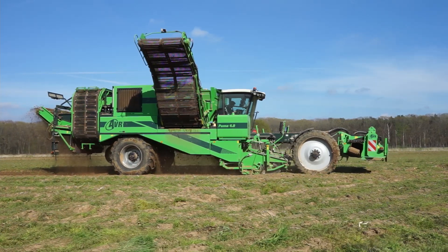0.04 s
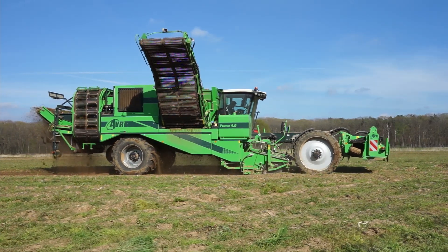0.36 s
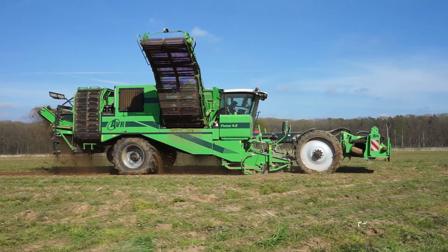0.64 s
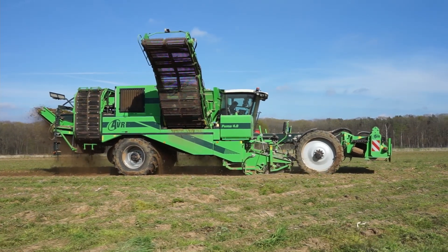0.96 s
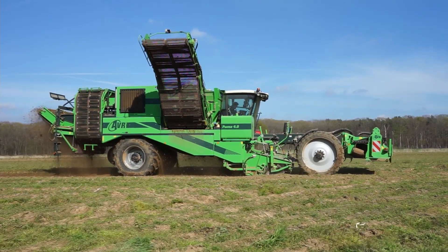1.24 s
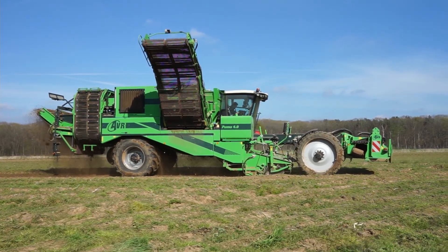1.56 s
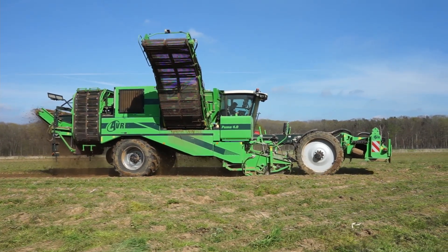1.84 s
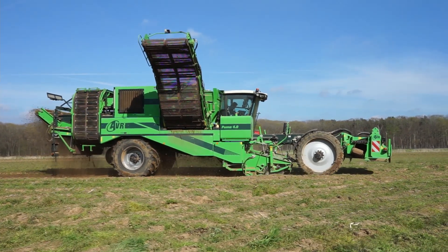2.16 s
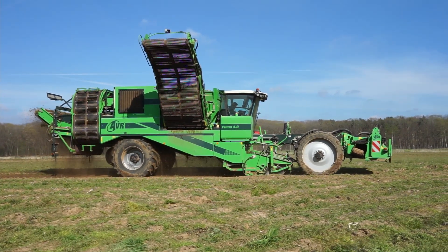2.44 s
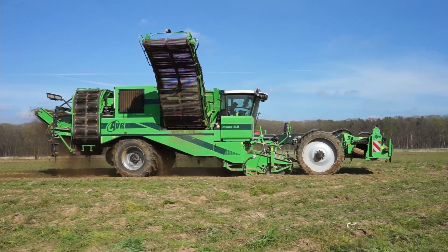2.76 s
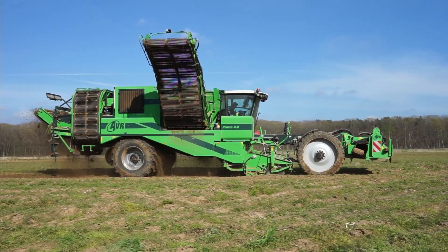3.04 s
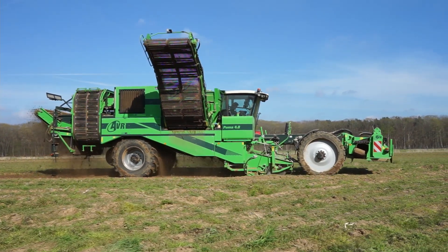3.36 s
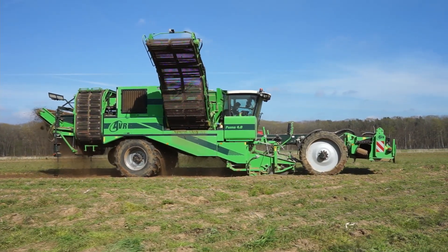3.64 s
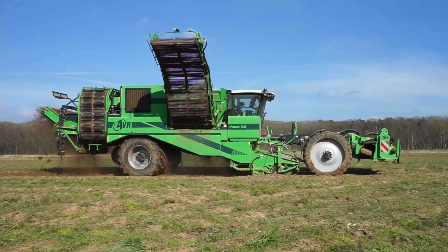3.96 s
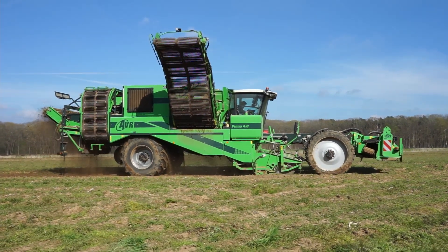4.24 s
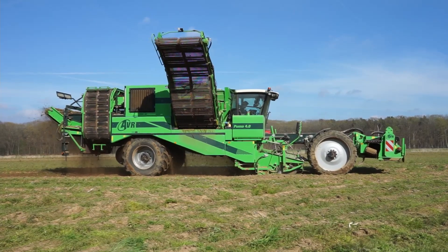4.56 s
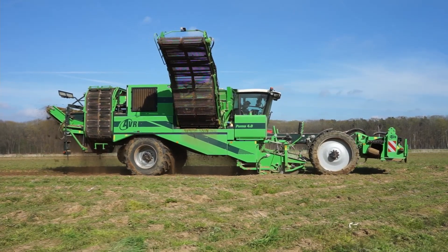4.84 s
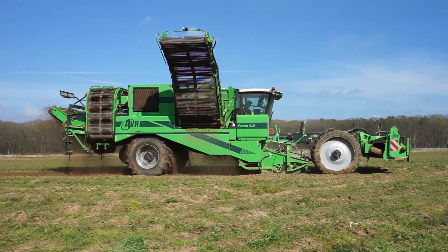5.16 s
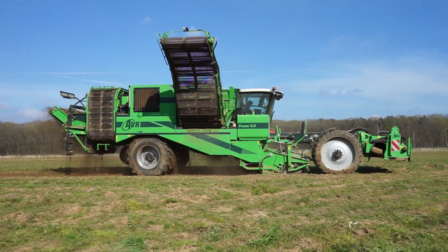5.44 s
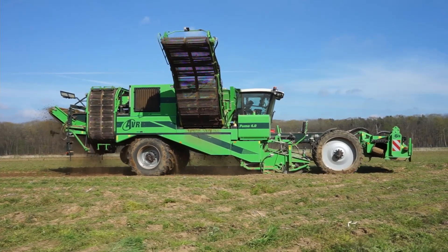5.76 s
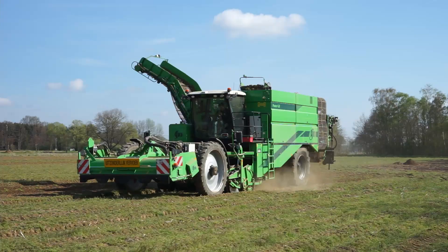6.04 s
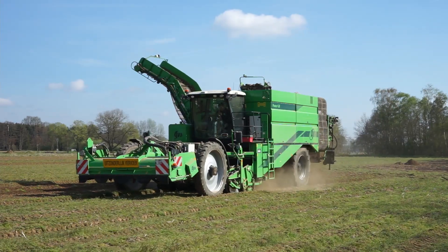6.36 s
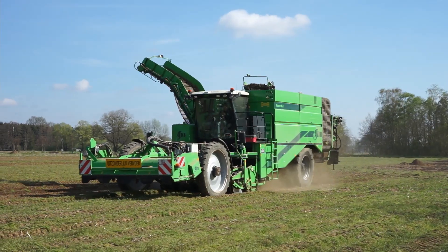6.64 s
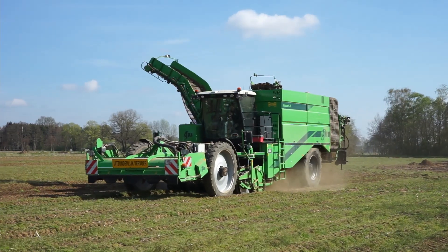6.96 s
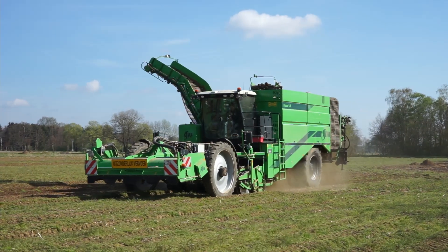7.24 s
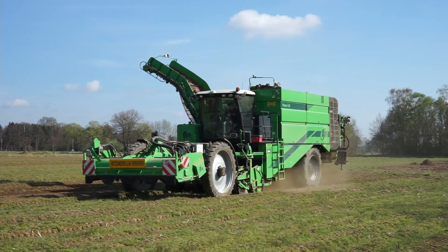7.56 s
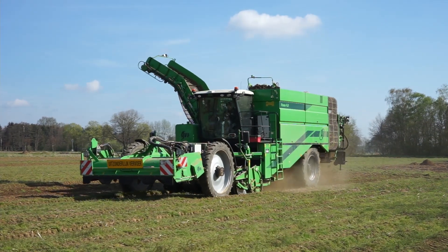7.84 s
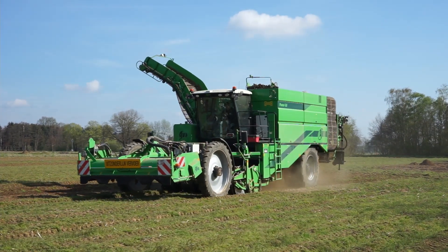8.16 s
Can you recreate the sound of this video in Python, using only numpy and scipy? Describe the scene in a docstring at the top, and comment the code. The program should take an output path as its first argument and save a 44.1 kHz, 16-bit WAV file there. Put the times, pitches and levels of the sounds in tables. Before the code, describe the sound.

A large farm harvester's diesel drones, with whining hydraulics and rattling belts, in gusty wind; later, heavy clods boom on its sheet steel.

```python
"""A self-propelled potato harvester creeps over a windy field. First we hear it from the side: its
six-cylinder diesel drones, a hydraulic pump whines, sieve belts rattle and crop drums on the steel
body, while gusts buffet the microphone. Near 4 seconds its open middle passes, and an echo sweeps
through the rattle. Just after 6 seconds we are suddenly in front of the machine. It grows louder as
it comes closer, and heavy clods boom on its sheet steel."""
import sys
import numpy as np
from scipy import signal
from scipy.fft import rfft, irfft, next_fast_len
from scipy.io import wavfile
from scipy.ndimage import uniform_filter1d, map_coordinates

SR = 44100
rng = np.random.default_rng(int(sys.argv[2]) if len(sys.argv) > 2 else 0)


def put_to_file(sound):
    """Save the sound as 16-bit audio at rate SR, in the file named by the first command-line argument."""
    columns = np.atleast_2d(sound).T  # one column per channel
    safe = np.clip(columns, -1, 1)
    whole_steps = np.round(safe * 32767)
    wavfile.write(sys.argv[1], SR, whole_steps.astype(np.int16))


N = 365588
TIME = np.arange(N) / SR
BESIDE, AHEAD = range(2)  # the two views; a table "per view" holds one list for each, in this order
BESIDE_END_S, AHEAD_START_S = 6.081, 6.083

# Engine speed, heard as the pump's main whine. Each row: time in seconds, pitch in Hz.
PUMP_PITCH = [(0, 582.3), (1.6, 579.5), (2.3, 588.4), (3.35, 580.3), (4, 585.7), (4.5, 581), (5.05, 589.5),
              (5.45, 584), (5.8, 582), (6.9, 583.8), (7.3, 584.6), (8.3, 583.7)]
# Exhaust tones, per view. Each row: multiple of the firing rate, relative level in dB.
EXHAUST_TONES = ([(1, -13), (2, -0.5), (3, -12), (4, -24.5)], [(1, -27), (2, 1.5), (3, -27), (4, -28)])
# The engine's metallic ring, per view. Each row: pitch in Hz, width in Hz, relative level in dB.
ENGINE_RINGS = ([(3680, 510, -2.5), (5110, 170, 3), (5450, 200, -5), (5430, 100, 4)], [(3880, 120, -7),
                (5590, 100, -9), (5490, 100, -6), (6500, 200, -15)])
# Pump and gear tones, per view. Each row: multiple of the piston rate, relative level in dB.
PUMP_TONES = ([(1, -6.5), (2, -2), (3, -15), (7.11, -20)], [(1, -1.5), (2, 1), (3, -13), (4, -22),
              (7.11, -10.5)])
# How loud the pump is, per view. Each row: time in seconds, level in dB.
PUMP_LEVEL = ([(0, -31.5), (1.4, -29.5), (2.6, -31.5), (3.5, -28.5), (4.85, -30), (5.5, -39.5), (5.85, -27),
              (6.05, -36.5)], [(6.1, -40.5), (7.2, -38.5), (8.3, -34.5)])
# Crop on the sieve belts. Each row: time in seconds, swell of the rattle in dB.
CROP_LOAD = [(0, 2), (0.9, 0.7), (1.3, 3), (1.72, 2.1), (1.85, -1.5), (2.03, 2.5), (2.55, -0.3), (2.95, -1),
             (3.5, 1.3), (4.05, 2.5), (4.65, -0.1), (5.05, 2), (5.2, -1.3), (6.05, 0.4)]
# Steel rods and chains, per view. Each row: frequency in Hz, relative level in dB.
ROD_SPECTRUM = ([(400, -13), (850, 1), (1400, 1.5), (1800, -1.5), (2250, -0.5), (2700, -5.5), (3400, -10.5),
                (5000, -22)], [(400, -17.5), (850, -6), (1400, -3.5), (1800, -7.5), (2250, -7.5),
                (2700, -11), (3400, -13.5), (5000, -31.5)])
# Sifting soil, per view. Each row: frequency in Hz, relative level in dB.
SOIL_SPECTRUM = ([(1800, -6), (3300, -4), (3800, -1), (4500, 0.5), (6000, -1.5), (7300, -9.5),
                 (8500, -10.5), (11000, -19)], [(1800, -24), (3300, -23), (3800, -0.5), (4500, -1),
                 (6000, -4), (7300, -10), (8500, -11.5), (11000, -19)])
# The drumming body, per view. Each row: frequency in Hz, relative level in dB.
BODY_SPECTRUM = ([(20, -32), (45, -10), (70, -6.5), (110, -5.5), (165, -1), (200, -11.5), (260, -16.5),
                 (400, -20), (520, -22.5), (780, -25.5), (1200, -34)], [(20, -30), (45, -22), (70, -4),
                 (110, -9.5), (160, -5.5), (200, -7), (260, -6), (320, -14.5), (400, -23), (520, -25.5),
                 (780, -25), (1200, -50)])
# Heavy clods dropping in. Each row: start in seconds, peak level in dB.
CLOD_DROPS = [(6.719, -17), (6.894, -18.5), (7.129, -22), (7.184, -24), (7.255, -20), (7.518, -15),
              (7.835, -17.5), (8.146, -14)]
# The sheet steel they hit. Each row: pitch in Hz, relative level in dB, seconds to fade by 60 dB.
PANEL_RINGS = [(111, -23, 0.34), (156.2, -1.5, 0.39), (167.6, -3, 0.32), (233, -13.5, 0.49), (277, -31, .1)]
# The echo's longer path, shortest as the opening passes. Each row: time in seconds, delay in ms.
ECHO_DELAY = [(0, 1), (3.2, 1.03), (3.5, 0.67), (3.7, 0.637), (4.42, 0.31), (4.8, 0.57), (5.2, 0.75),
              (6.05, 0.81), (6.8, 0.99), (7.6, 1.2)]
# How alike left and right sound. Each row: frequency in Hz, likeness from 0 to 1.
STEREO_LIKENESS = [(60, 0.99), (500, 0.99), (1800, 0.86), (3300, 0.57), (6000, 0.78), (10000, 0.1)]
# Which side is louder, per view. Each row: frequency in Hz, left minus right in dB.
STEREO_BALANCE = ([(200, 0), (600, 1.5), (1900, -1), (5500, 2), (10000, -1.5)], [(300, -.5), (600, -3.5),
                  (3300, -4), (5800, -3), (10000, -5)])
# Gusts on the microphone. Each row: start in seconds, length in seconds, strength in dB.
WIND_GUSTS = [(0.11, 0.04, -27), (0.26, 0.3, -27), (1.08, 0.29, -36.5), (1.49, 0.23, -32.5),
              (1.77, 0.049, -21.5), (2.13, 0.094, -31), (2.6, 0.15, -24), (2.88, 0.041, -26.5),
              (3.35, 0.33, -28), (4.09, 0.15, -27), (4.375, 0.49, -26.5), (4.96, 0.32, -28.5),
              (5.408, 0.26, -24.5), (5.78, 0.33, -30), (7.47, 0.1, -31), (7.854, 0.12, -29)]


def harvester(view, drone_db, drone_follow, clatter_db, rattle_db, soil_db, churn_db, body_db,
              body_follow, lead_ms):
    """The whole machine heard from one place. Engine and pump turn on one shaft."""
    piston_cycles = np.cumsum(curve(PUMP_PITCH) / 2) / SR
    firing_cycles = piston_cycles / 4.312
    tones = exhaust(view, firing_cycles, drone_db, drone_follow) + pump(view, piston_cycles)
    sieve = panel_echoes(sieve_belts(view, rattle_db, soil_db)) + clinks(view, rattle_db - 7.5)
    crop = body_drumming(view, body_db, body_follow) + rollers(view, churn_db)
    noises = sieve + crop + engine_clatter(view, firing_cycles, clatter_db)
    return place_in_stereo(tones + sweeping_echo(noises), view, lead_ms)


def exhaust(view, firing_cycles, level_db, follow):
    """The diesel's firings blend into a low, throbbing drone."""
    loudness = gain(level_db + follow * swell_db(view) + 1.9 * wobble(9))
    return loudness * shaft_tones(EXHAUST_TONES[view], firing_cycles, waver_db=0.5, smear=0.16)


def engine_clatter(view, firing_cycles, level_db):
    """Each firing of the diesel sets off a bright metallic ring."""
    def rings(hz):
        return sum(gain(db) * resonance(hz, pitch, width) for pitch, width, db in ENGINE_RINGS[view])
    pulses = gain(2.2 * np.cos(2 * np.pi * firing_cycles) + 1.7 * wobble(14))
    ringing = normalize(pulses * spread(rng.standard_normal((2, N)), rings))
    return gain(level_db + 0.83 * swell_db(view) + 2 * passing()) * ringing


def pump(view, piston_cycles):
    """The hydraulic pump's fast pistons and the gears whine."""
    loudness = gain(curve(PUMP_LEVEL[view]))
    return loudness * shaft_tones(PUMP_TONES[view], piston_cycles, waver_db=1.2, smear=0.19)


def sieve_belts(view, rattle_db, soil_db):
    """Rods and chain links chatter while soil hisses through them."""
    shake_db = 0.69 * wobble(22)
    rods = spread(impacts(per_second=8000, scatter_db=2.5), spectrum(ROD_SPECTRUM[view]))
    soil = spread(impacts(per_second=12000, scatter_db=2), spectrum(SOIL_SPECTRUM[view]))
    rods *= gain(rattle_db + swell_db(view) + shake_db + 0.39 * wobble(18))
    soil *= gain(soil_db + 0.81 * swell_db(view) + 0.46 * passing() + shake_db + 0.69 * wobble(28))
    return rods + soil


def clinks(view, level_db, centre_hz=1772, fade_s=0.23, count=110):
    """Now and then a stone or link rings one rod above the chatter."""
    out, t = np.zeros(N + SR), np.arange(SR // 4) / SR
    attack = 1 - np.exp(-t / 0.004)
    for when, (pitch, size) in zip(rng.random(count), rng.standard_normal((count, 2))):
        ring = np.sin(2 * np.pi * centre_hz * np.exp(0.22 * pitch) * t)
        out[int(when * N):][:len(t)] += gain(4.2 * size - 60 * t / fade_s) * attack * ring
    return gain(level_db + swell_db(view)) * out[:N]


def body_drumming(view, level_db, follow):
    """Tumbling crop drums on the panels, louder as the rattle grows."""
    loudness = gain(level_db + follow * swell_db(view) + 0.36 * wobble(9.9))
    return loudness * spread(impacts(per_second=1800, scatter_db=5), spectrum(BODY_SPECTRUM[view]))


def rollers(view, level_db):
    """Crop churns between the rollers with a hollow sound."""
    blows = impacts(per_second=2500, scatter_db=2.5)
    churn = spread(blows, lambda hz: resonance(hz, centre_hz=622, width_hz=210))
    return gain(level_db + 0.88 * swell_db(view) + 5 * passing() ** 3) * churn


def clods(attack_s=0.0037):
    """Soft, heavy clods make the sheet steel boom, each a little differently."""
    out, t = np.zeros(N + SR), np.arange(SR // 3) / SR
    for start, peak_db in CLOD_DROPS:
        boom = np.zeros(len(t))
        for hz, db, fade_s in PANEL_RINGS:
            size, detune = rng.standard_normal(2)
            ring = np.sin(2 * np.pi * hz * (1 + 0.027 * detune) * t)
            boom += gain(db + 2 * size - 60 * t / fade_s) * ring
        boom *= 1 - np.exp(-t / attack_s)
        out[round(start * SR):][:len(t)] += gain(peak_db) * boom / np.abs(boom).max()
    return out[:N]


def sweeping_echo(x, dull_hz=14000):
    """A duller echo cancels some pitches; these gaps glide and deepen as the machine passes."""
    strength = 0.054 + 0.27 * passing()
    read_at = np.arange(N) - curve(ECHO_DELAY) * SR / 1000
    dull = filtered(x, lambda hz: 1 / (1 + (hz / dull_hz) ** 2))
    echo = np.array([map_coordinates(side, [read_at]) for side in dull])
    return (x + strength * echo) / np.sqrt(1 + strength ** 2)


def panel_echoes(x, depth_db=1.98):
    """Echoes off the many panels leave narrow, slowly shifting peaks and dips in the spectrum."""
    _, _, slices = signal.stft(x, SR, nperseg=1024)
    ripple = uniform_filter1d(rng.standard_normal(slices.shape[1:]), size=3, axis=0)  # across pitch
    ripple = uniform_filter1d(ripple, size=45, axis=1)  # across time
    return signal.istft(slices * gain(depth_db * normalize(ripple)), nperseg=1024)[1][:, :N]


def wind(gust_db, rumble_db, flutter_db, rumble_follow, flutter_follow):
    """Air swirls at each side of the microphone: a rumble, and a flutter that grows more in gusts."""
    def swirls(hz_db_rows):
        noise = filtered(rng.standard_normal((2, N)), spectrum(hz_db_rows))
        return normalize(noise * gain(1.3 * np.array([wobble(45), wobble(45)])))
    rumble = swirls([(15, -8), (45, -11), (90, -4), (150, -2), (220, -6), (320, -25.5), (600, -29.5)])
    flutter = swirls([(80, -13), (200, 4), (340, 2), (500, -4.5), (700, -10.5), (1000, -20),
                      (2000, -36)])
    rumble *= gain(rumble_db + rumble_follow * gust_db)
    flutter *= gain(flutter_db + flutter_follow * gust_db + 0.74 * wobble(17))
    return rumble + flutter


def gusts(breeze_db, rise_s=0.045, fall_s=0.1):
    """Wind strength in dB above the steady breeze: each gust rises, holds and falls away."""
    power = np.ones(N)
    for start, length, db in WIND_GUSTS:
        corners = [start - rise_s, start, start + length, start + length + fall_s]
        power += (gain(db - breeze_db) * np.interp(TIME, corners, [0, 1, 1, 0])) ** 2
    return 10 * np.log10(power)


def swell_db(view, approach_db_per_s=3):
    """The level follows the crop load from the side, and the machine's approach from ahead."""
    if view == BESIDE:
        return curve(CROP_LOAD)
    return approach_db_per_s * (TIME - (AHEAD_START_S + TIME[-1]) / 2)


def passing(peak_s=3.84, arrive_s=0.35, leave_s=1.65):
    """How squarely the machine's open middle faces us, from 0 to 1."""
    return np.exp(-((TIME - peak_s) / np.where(TIME < peak_s, arrive_s, leave_s)) ** 2)


def shaft_tones(rows, cycles, waver_db, smear):
    """The tones of a turning shaft. Moving air unsettles their level and timing."""
    out = np.zeros(N)
    for multiple, db in rows:
        loudness = np.sqrt(2) * gain(db + waver_db * wobble(6.3))
        out += loudness * np.sin(multiple * (2 * np.pi * cycles + smear * wobble(22)))
    return out


def impacts(per_second, scatter_db):
    """Two streams of tiny blows, random in time and size."""
    hits = rng.random((2, N)) < per_second / SR
    sizes = gain(scatter_db * rng.standard_normal((2, N)))
    return hits * sizes * np.sign(rng.random((2, N)) - 0.5)


def spread(pair, colour):
    """Turn two unrelated signals into one wide stereo sound with the given tone colour."""
    def response(hz):
        likeness = at_frequency(STEREO_LIKENESS, hz)
        return colour(hz) * np.sqrt([1 + likeness, 1 - likeness])
    middle, side = filtered(pair, response)
    return normalize(np.array([middle + side, middle - side]))


def place_in_stereo(x, view, lead_ms):
    """Balance left and right. The nearer side of the microphone hears the machine lead_ms earlier."""
    half = np.array([[0.5], [-0.5]])
    def response(hz):
        balance = gain(half * at_frequency(STEREO_BALANCE[view], hz))
        return balance * np.exp(2j * np.pi * hz * half * lead_ms / 1000)
    return filtered(x, response)


def resonance(hz, centre_hz, width_hz):
    """A filter curve with one rounded peak."""
    return 1 / (1 + (2 * (hz - centre_hz) / width_hz) ** 2)


def spectrum(rows):
    """A filter curve through rows of Hz and dB, falling steeply above the last row."""
    return lambda hz: gain(at_frequency(rows, hz)) / (1 + (hz / rows[-1][0] / 2) ** 4)


def filtered(x, response):
    """Multiply each frequency in x by response(hz)."""
    size = next_fast_len(N + 8192, True)
    return irfft(rfft(x, size) * response(np.fft.rfftfreq(size, 1 / SR)), size)[..., :N]


def at_frequency(rows, hz):
    """Read between rows of frequency and value, giving each octave about equal room."""
    row_hz, values = np.transpose(rows)
    return np.interp(np.log(hz + 1), np.log(row_hz + 1), values)


def curve(rows):
    """Join rows of time and value into one value per sample."""
    return np.interp(TIME, *np.transpose(rows))


def wobble(per_second):
    """A smooth curve through this many random points a second."""
    points = rng.standard_normal(int(N * per_second / SR) + 4)
    coarse = TIME[::64]
    return np.interp(TIME, coarse, map_coordinates(points, [coarse * per_second]))


def gain(db):
    """Turn decibels into a multiplier."""
    return 10 ** (np.asarray(db) / 20)


def normalize(x):
    """Scale x to an average (rms) level of 1."""
    return x / np.sqrt(np.mean(x ** 2) + 1e-20)


def scene(fade_s=0.01):
    """The harvester from the side, a blink of silence, then from ahead."""
    gust_db = gusts(breeze_db=-35.5)
    # A "follow" setting is the dB a sound gains for each dB of swell or gust.
    beside = harvester(BESIDE, drone_db=-20.5, drone_follow=0.1, clatter_db=-44, rattle_db=-31.5,
                       soil_db=-38.5, churn_db=-37, body_db=-21.5, body_follow=0.49, lead_ms=0.019)
    beside *= gain(-0.0838 * gust_db)  # the machine's sound dips briefly under each gust
    beside += wind(gust_db, rumble_db=-24.5, flutter_db=-35.5, rumble_follow=0.15, flutter_follow=1.23)
    ahead = harvester(AHEAD, drone_db=-35.5, drone_follow=0.78, clatter_db=-53.5, rattle_db=-36,
                      soil_db=-46, churn_db=-38.7, body_db=-30, body_follow=0.64, lead_ms=0)
    ahead += clods()
    ahead += wind(gust_db, rumble_db=-36, flutter_db=-43, rumble_follow=0.62, flutter_follow=0.77)
    fade_out = np.clip((BESIDE_END_S - TIME) / fade_s, 0, 1)
    fade_in = np.clip((TIME - AHEAD_START_S) / fade_s, 0, 1)
    return beside * fade_out + ahead * fade_in


def record(dry):
    """Remove the highest treble, from 11050 Hz up."""
    return filtered(dry, lambda hz: hz < 11050)


dry = scene()
out = record(dry)
put_to_file(out)
```